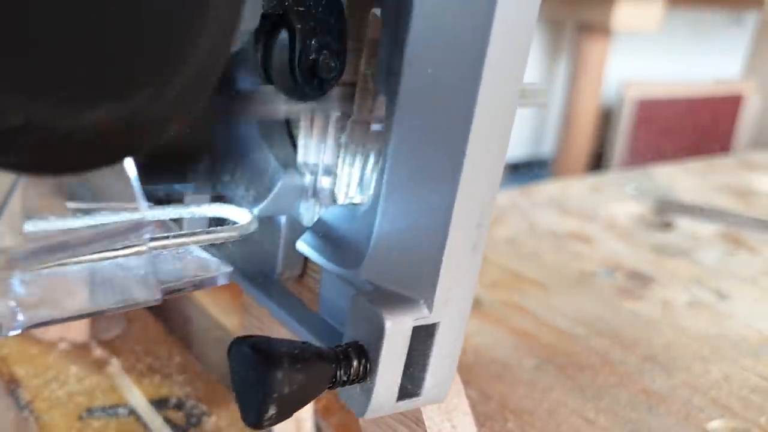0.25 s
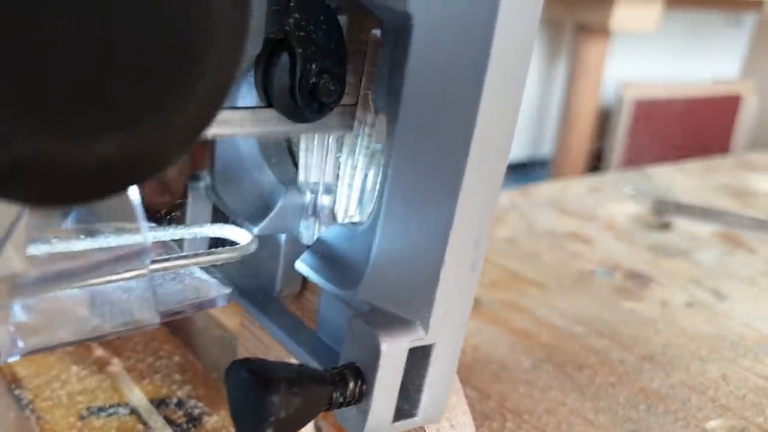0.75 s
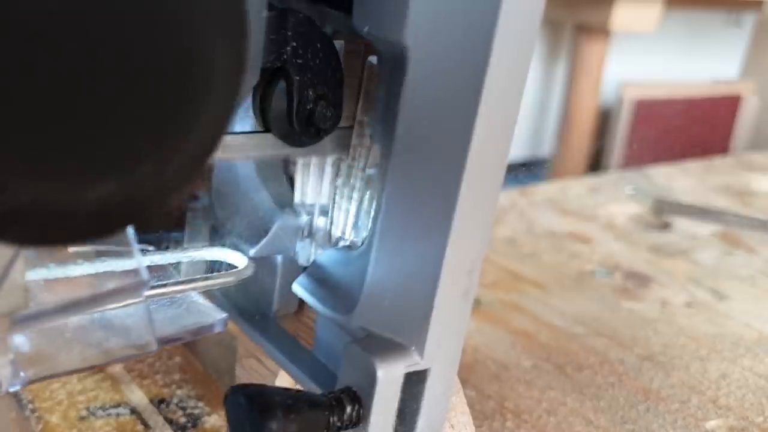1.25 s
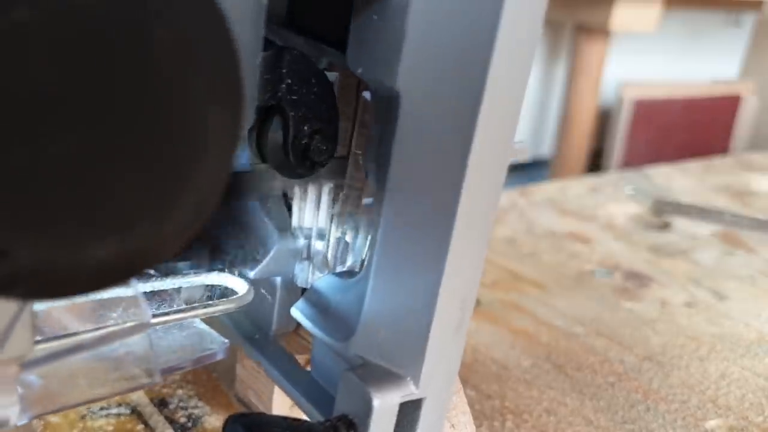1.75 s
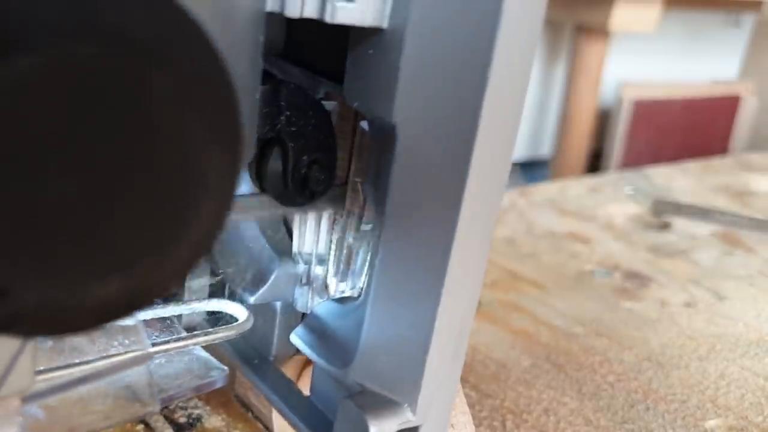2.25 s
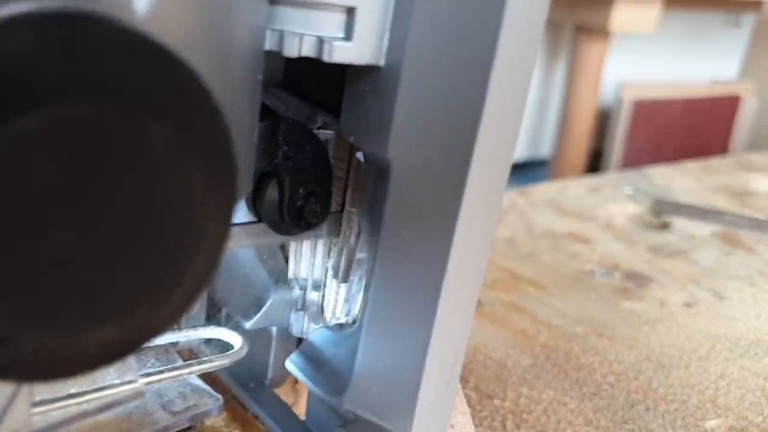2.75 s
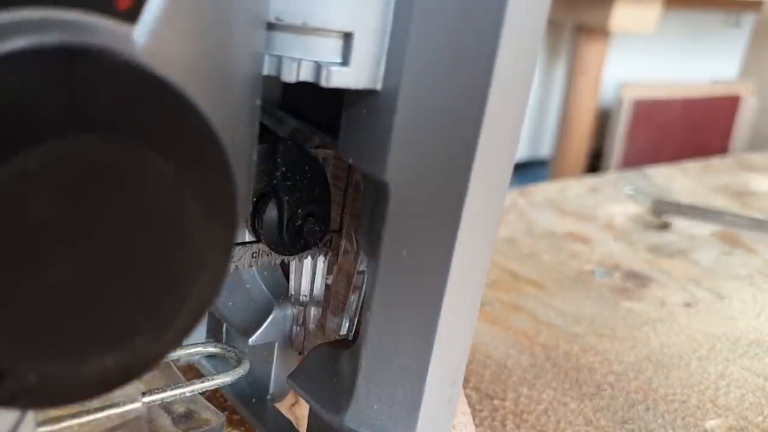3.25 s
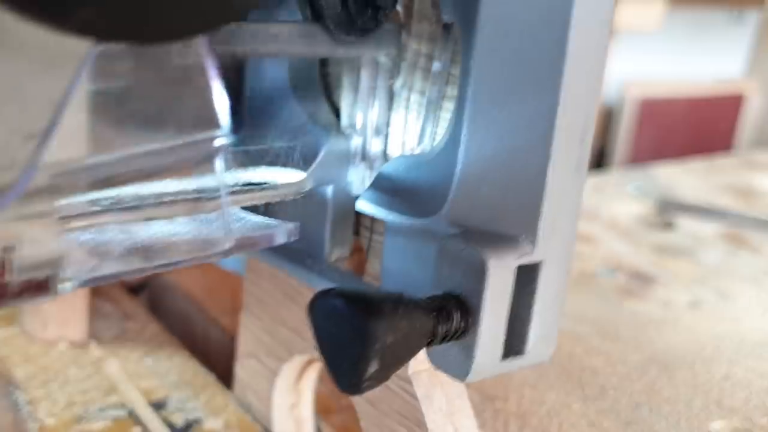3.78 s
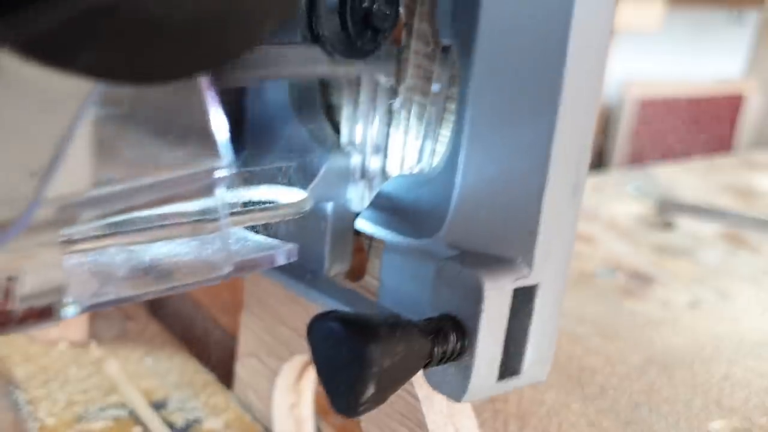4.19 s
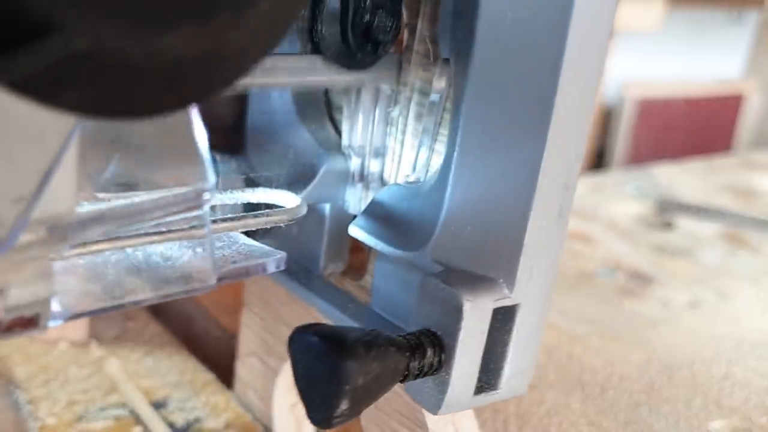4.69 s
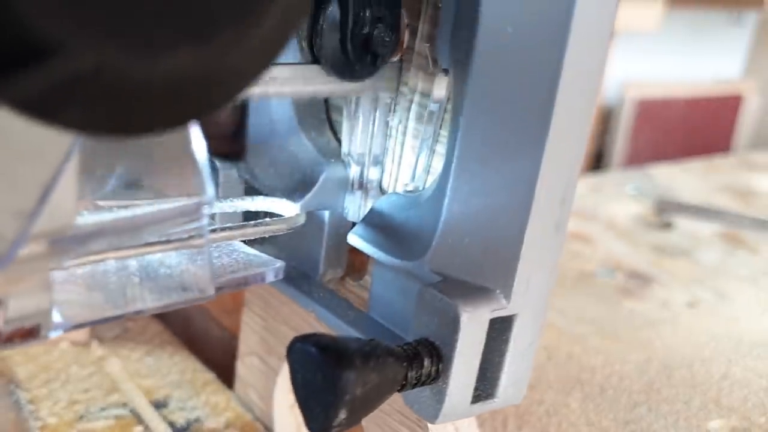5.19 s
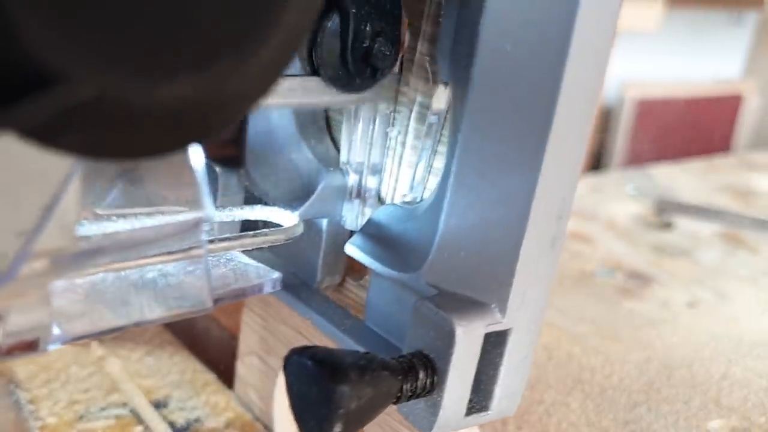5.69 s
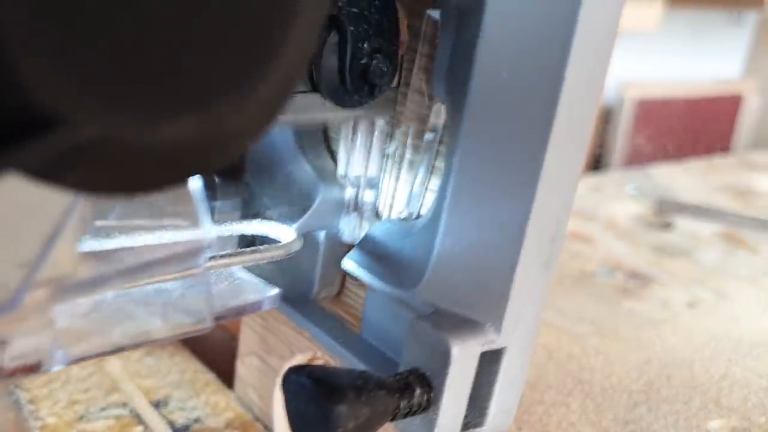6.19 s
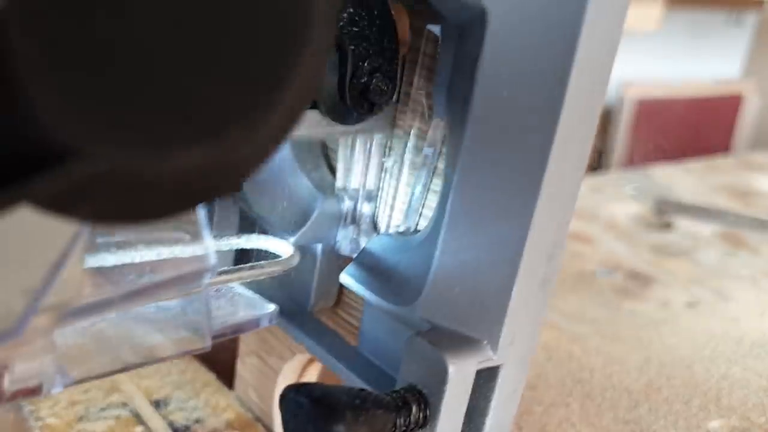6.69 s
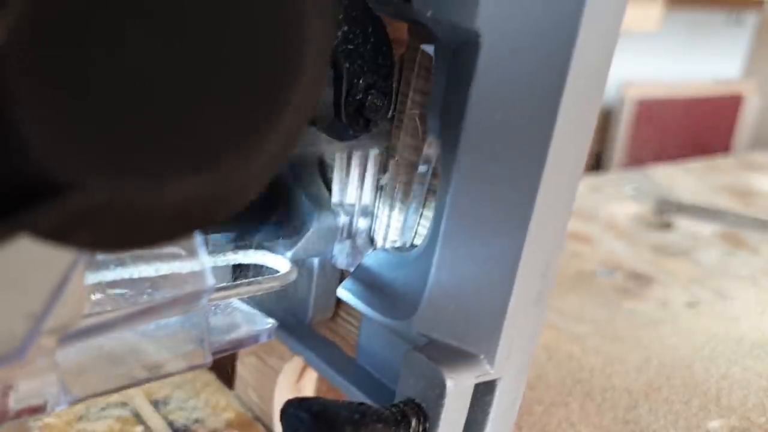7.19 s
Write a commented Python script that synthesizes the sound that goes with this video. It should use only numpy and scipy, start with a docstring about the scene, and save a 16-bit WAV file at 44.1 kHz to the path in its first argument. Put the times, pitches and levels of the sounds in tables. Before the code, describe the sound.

An electric jigsaw cuts a wooden board, close up in a quiet workshop. Its gears whine and rattle while the blade rasps, chattering and squealing as the teeth bite, and small splinters snap off. The motor stops for a moment, then starts again with a louder, throbbing rasp. It drops to a slower, lower run before climbing back to full speed.

```python
"""A jigsaw cutting a board

An electric jigsaw works through wood, close up in a quiet workshop. Its gears whine and rattle,
its body shakes and its blade rasps, chattering where the teeth bite. Splinters snap off.
It stops for a moment, with a few faint handling ticks, then runs on louder, the rasp throbbing
with each stroke. For a while it slows down, then it picks up speed again."""
import sys
import numpy as np
from scipy import signal
from scipy.fft import rfft, irfft
from scipy.io import wavfile
from scipy.ndimage import uniform_filter1d

SR = 44100
rng = np.random.default_rng(int(sys.argv[2]) if len(sys.argv) > 2 else 0)


def materialize(psi):
    """Save the field psi as 16-bit PCM at rate SR to the path in sys.argv[1].

    A 1-D psi becomes a single channel; in a 2-D psi each row is a channel.
    """
    bounded = np.clip(np.atleast_2d(psi).T, -1, 1)
    quanta = np.round(bounded * 32767).astype(np.int16)
    wavfile.write(sys.argv[1], SR, quanta)


N = 328104
T = np.arange(N) / SR
HZ = np.fft.rfftfreq(2 * N, 1 / SR)
FULL_SPEED_HZ = 1982  # gear teeth meeting each second: the "gear pitch"
BASE_TEETH, STROKE_TEETH = 57, 40  # cycles of the gear pitch per cycle of the body's slowest shaking, and per throb of the rasp

# when the motor is on (start [s], stop [s])
MOTOR_RUNS = [(-.05, 3.148), (3.778, 7.5)]
# the motor glides to a new speed, then creeps up (start [s], glide [s], gear pitch [Hz], creep [Hz/s])
SPEED_CHANGES = [(2.8, .26, 2012, 0), (3.07, .14, 1200, 0), (3.6, .1, 1987, 0), (3.84, .16, 1958, 80),
                 (4.34, .18, 1019, 0), (4.695, .08, 1388, 36), (5.85, .1, 1960, 12)]
# five stages of work: light, restart, sag, slow, full speed (start [s], slack in the gears [teeth])
STAGES = [(-1, .035), (3.5, .075), (4.46, .04), (4.74, .065), (5.885, .045)]
# each stage's mix, before speed and bite act on it
# (blade [dB], shaking [dB], whine [dB], rattle [dB], throb depth)
STAGE_MIX = [(-47.5, -68, 3, -59.5, 0.039), (-35.5, -57, 0.7, -51.5, 0.19), (-35, -58, -3, -59.5, 0.16),
             (-35.5, -50.5, 0.5, -57.5, 0.16), (-34.9, -56.5, -.5, -47.5, 0.16)]
# the teeth dig in (start [s], stop [s], time to come free [s], squeal against tearing [dB])
CUTS = [(-.08, .19, .03, -14), (1.28, 2.7, .15, -4)]
# the blade snags and swells (time [s], half length [s], boost [dB])
SNAGS = [(1.475, .05, 3.5), (2.6, 0.025, 2.5), (5.45, 0.14, 1)]
# gear tones, one list a stage (multiple of the body's slowest shaking rate, relative level [dB])
WHINE_TONES = [
    [(49, -69.5), (55, -71.5), (57, -61), (59, -65.5), (64, -81), (65, -69.5), (69, -78), (115, -70),
     (116, -73), (228, -61)],
    [(57, -50), (59, -59), (62, -69), (64, -53), (111, -69), (112, -49), (113, -61), (170, -54), (228, -53),
     (232, -69)],
    [(57, -63), (114, -55), (171, -52), (228, -55.5)],
    [(47, -78), (54, -66), (57, -56), (64, -64), (76, -70), (83, -64), (114, -71), (116, -60.5),
     (123, -62.5), (171, -59), (203, -62)],
    [(52, -59), (57, -48), (59, -54.5), (62, -57.5), (64, -59), (65, -57), (69, -56.5), (107, -56.5),
     (112, -61), (116, -56.5), (228, -47), (237, -64)],
]
# tones of the shaking body, one list a stage (multiple of its slowest shaking rate, relative level [dB])
SHAKE_TONES = [
    [(1, -7), (2, -0.5), (4, -13.5), (6, -18), (7, -9), (8, -9), (10, -14.5), (13, -13.5)],
    [(1, -0.5), (2, 3.5), (4, -20), (5, -3), (7, -3.5), (8, -9.5), (10, -11), (13, -11), (16, -10),
     (20, -9)],
    [(2, 1), (7, -17), (8, -5), (10, 0.5), (13, -1.5)],
    [(2, -1), (4, -22.5), (7, -16.5), (8, -15), (9, -18), (13, -34), (14, -23), (17, -15), (19, -24),
     (22, -16.5), (24, -20), (30, -17.5)],
    [(1, 0), (2, -2.5), (3, -15), (4, -7), (5, -12), (6, -19), (7, -8), (8, -8), (10, -11), (13, -7),
     (21, -11.5), (23, -11.5), (26, -6.5)],
]
# ringing of the gear case (pitch [Hz], width [Hz], relative level [dB])
CASE_RING = [(1687, 53, -4.5), (1830, 16, -4.5), (1876, 25, -0.5), (1993, 30, -0.5), (2180, 23, -12.5),
             (2240, 37, -3), (2418, 43, -9.5)]
# ringing of the blade, rubbing in its guide and biting (pitch [Hz], width [Hz], relative level [dB])
RUB_RING = [(7960, 55, 3.5), (8120, 95, -7), (8040, 69, -6), (8230, 45, 3.5), (7400, 120, -23.5),
            (7360, 55, -5), (3100, 66, -10.5), (4000, 150, -16.5)]
BITE_RING = [(1770, 70, 4), (4040, 200, -4), (5800, 170, -4.5), (7760, 270, -2), (10300, 210, -3)]
# tone of the blade's rasp in each kind of work (frequency [Hz], relative level [dB])
RASP_LIGHT = [(40, -33), (130, -23), (300, -23), (600, -17.5), (1050, -17), (1400, -12), (1900, -14),
              (2700, -12), (4200, -12.5), (6000, -10.5), (7200, -4), (8000, -4), (11000, -19), (14000, -27)]
RASP_BITE = [(40, -26.5), (130, -28), (300, -28.5), (600, -23.5), (1050, -22), (1400, -19), (1900, -6),
             (2700, -18.5), (4200, -12.5), (5200, -15.5), (6000, -12.5), (7200, -3), (8000, 0),
             (11000, -20.5), (14000, -24.5)]
RASP_RESTART = [(40, -19), (130, -21.5), (300, -20), (600, -18), (1050, -17), (1400, -14), (1900, -8),
                (2700, -13.5), (4200, -11.5), (6000, -10.5), (7200, -5.5), (8000, -3), (11000, -17.5),
                (14000, -25.0)]
RASP_SLOW = [(40, -21), (130, -16), (300, -15.5), (600, -15), (1050, -13), (1400, -11), (1900, -9),
             (2700, -9.5), (4200, -8), (6000, -8), (7200, -2), (8000, -1), (11000, -13.5), (14000, -23)]
RASP_HARD = [(40, -36), (130, -25), (300, -22.5), (600, -19), (1050, -18.5), (1400, -11.5), (1900, -16.5),
             (2700, -11.5), (4200, -11.5), (6000, -9.0), (7200, -5), (8000, -2), (11000, -18),
             (14000, -27.0)]
# squeal of the teeth in the cut (multiple of their passing rate, relative level [dB])
SQUEAL_TONES = [(1, -1), (2, -9), (3, -1), (4, -1), (5, -8)]
# the low hush of the room (frequency [Hz], relative level [dB])
ROOM_HUSH = [(15, -32), (25, 1.5), (54, 9), (80, -7.5), (160, -12), (271, -3), (436, -12.5), (14000, -35)]
# large splinters snapping off (time [s], relative level [dB])
SPLINTERS = [(0.016, -31), (0.0922, -27), (0.168, -26.5), (0.1885, -29), (0.3112, -33.5), (1.5745, -29),
             (1.8424, -29), (1.9195, -38), (1.9659, -28.5), (2.2815, -28), (2.3765, -28.5), (3.7907, -28),
             (3.8116, -38), (7.225, -20), (7.3816, -26)]
# ringing of the blade after a snap or tick (pitch [Hz], width [Hz], relative level [dB])
SNAP_RING = [(1920, 130, -7.5), (3920, 270, -10), (5700, 310, -10), (7770, 520, -1), (9600, 900, -16)]
# faint handling ticks in the pause (time [s], relative level [dB])
HANDLING_TICKS = [(3.4296, -91), (3.5994, -81), (3.6544, -86)]


def amp(db):
    """Turns decibels into a gain."""
    return 10 ** (np.asarray(db) / 20)


def evened(x):
    """Scales a signal to an average strength (rms) of 1."""
    return x / np.sqrt(np.mean(x ** 2) + 1e-20)


def spectrum(points):
    """Gain at every frequency, from a few (Hz, dB) points."""
    hz, db = np.transpose(points)
    return amp(np.interp(np.log(HZ + 1), np.log(hz + 1), db))


def peaks(ring):
    """Gain at every frequency of something that rings at a few pitches."""
    return np.sqrt(sum(amp(db) ** 2 / (1 + ((HZ - hz) / width) ** 2) ** 2 for hz, width, db in ring))


def colour(x, gain):
    """Filters x so that each click rings on after it; the result has strength 1."""
    cepstrum = irfft(np.log(np.maximum(gain / gain.max(), 1e-5)))
    response = np.exp(rfft(2 * cepstrum[:N], 2 * N))
    return evened(irfft(rfft(x, 2 * N) * response)[:N])


def wander(rate_hz):
    """A smooth random drift of strength 1."""
    return evened(irfft(rfft(rng.standard_normal(2 * N)) / (1 + (HZ / rate_hz) ** 4))[:N])


def grit(per_s, spread_db, share):
    """Tiny clicks of uneven size in a smooth hiss; share is their part of the power."""
    sizes = amp(spread_db * np.minimum(rng.exponential(1, N), 4)) * rng.choice([-1, 1], N)
    clicks = evened(sizes * (rng.random(N) < per_s / SR))
    return np.sqrt(share) * clicks + np.sqrt(1 - share) * rng.standard_normal(N)


def held(rows):
    """A setting that holds from each (time, value) until the next."""
    starts, values = np.transpose(rows)
    return values[np.searchsorted(starts, T) - 1]


def stage_shares(blend_s=0.049):
    """How much of each stage is heard at every moment; the squares add up to 1."""
    begun = [np.clip((T - start) / blend_s + .5, 0, 1) for start, _ in STAGES] + [np.zeros(N)]
    return np.sqrt(np.maximum(-np.diff(begun, axis=0), 0))


def bite_depth(first=.94, settled=.5, grazing=.0999, entry_s=.1, settle_s=.45):
    """How hard the teeth bite, 0-1: each cut digs in, settles and comes free."""
    bite = grazing * (T < CUTS[-1][1])
    for start, stop, free_s, _ in CUTS:
        depth = settled + (first - settled) * np.exp(-((T - start) / settle_s) ** 2)
        entering = np.clip((T - start) / entry_s, 0, 1)
        leaving = np.clip(1 - (T - stop) / free_s, 0, 1)
        bite = np.maximum(bite, depth * entering * leaving)
    return bite


def motor_on(start, stop, rise_s=0.0073, brake_s=0.01):
    """The motor comes on at once and dies away under its brake."""
    return np.clip((T - start) / rise_s, 0, 1) * np.exp(-np.maximum(T - stop, 0) / brake_s)


def motor_speed(bite, sag_hz=16):
    """The gear pitch glides from speed to speed, sags under load and is never quite steady."""
    hz = np.full(N, float(FULL_SPEED_HZ))
    for start, glide_s, to_hz, creep in SPEED_CHANGES:
        progress = np.clip((T - start) / glide_s, 0, 1)
        target_hz = to_hz + creep * (T - start - glide_s)
        hz += (target_hz - hz) * np.sin(np.pi / 2 * progress) ** 2
    return hz - sag_hz * bite + 3 * wander(2)


def base_tones(teeth, tones, fade_db=0):
    """Tones at multiples of the slowest shaking rate; they drift, as every cycle lands a little differently."""
    turns = np.arange(teeth[0], teeth[-1] + BASE_TEETH, BASE_TEETH)
    sound = 0
    for multiple, db in tones:
        landing, fading = rng.standard_normal((2, len(turns)))
        slip = 0.013 * np.sqrt(multiple) * np.interp(teeth, turns, landing)
        drift_db = fade_db * np.sqrt(multiple / BASE_TEETH) * evened(uniform_filter1d(fading, size=4))
        level = np.interp(teeth, turns, amp(db + drift_db))
        cycles = multiple * teeth / BASE_TEETH + slip + rng.random()
        sound += level * np.cos(2 * np.pi * cycles)
    return np.sqrt(2) * sound


def gear_whine(teeth, gear_hz, bite):
    """Slack makes the gear tones waver and fade, more so while the blade bites or the speed changes."""
    changing = uniform_filter1d(np.clip(abs(np.gradient(gear_hz)) * SR / 5000, 0, 1), size=1500)
    slack = held(STAGES) + .07 * bite + .05 * changing
    loose_teeth = teeth + slack * wander(100)
    level = amp(-2.5 * bite - 6 * changing + 1.6 * wander(90))
    whine = np.zeros(N)
    for share, (_, _, db, _, _), tones in zip(stage_shares(), STAGE_MIX, WHINE_TONES):
        on = share > 0
        whine[on] += amp(db) * (share * level)[on] * base_tones(loose_teeth[on], tones, fade_db=1.8)
    return whine


def gear_rattle(stroke):
    """Loose gear teeth knock the case into ringing, pulsing a little with each stroke."""
    knocks = colour(grit(per_s=640, spread_db=-1, share=0.84), peaks(CASE_RING))
    return knocks * sum(share * amp(db) * np.exp(0.31 * depth * stroke)
                        for share, (_, _, _, db, depth) in zip(stage_shares(), STAGE_MIX))


def body_shake(teeth):
    """The saw's body shakes at multiples of a slow base rate."""
    shake = np.zeros(N)
    for share, (_, db, _, _, _), tones in zip(stage_shares(), STAGE_MIX, SHAKE_TONES):
        on = share > 0
        shake[on] += amp(db) * share[on] * evened(base_tones(teeth[on], tones))
    return shake


def blade_rasp(stroke):
    """The blade rubs through its guide and the cut, throbbing with each stroke and ringing near 8 kHz."""
    friction = grit(per_s=3500, spread_db=1.5, share=0.37) * amp(.5 * wander(240))
    shapes = RASP_LIGHT, RASP_RESTART, RASP_SLOW, RASP_SLOW, RASP_HARD
    rasp = np.zeros(N)
    for share, (*_, depth), shape in zip(stage_shares(), STAGE_MIX, shapes):
        throb = np.exp(depth * stroke)
        rasp += share * colour(friction * throb, spectrum(shape) * (1 + peaks(RUB_RING)))
    return rasp


def tooth_squeal(start_hz=1930, sink_hz_per_s=50):
    """The teeth squeal at their uneven passing rate, which sinks as the long cut deepens."""
    passing_hz = start_hz - sink_hz_per_s * np.maximum(T - CUTS[-1][0], 0)
    passes = np.cumsum(passing_hz + 35 * wander(25) + 65 * wander(300)) / SR
    return sum(amp(db + 3 * wander(200)) * np.cos(2 * np.pi * k * passes) for k, db in SQUEAL_TONES)


def blade_chatter(judder_hz=20.9):
    """Biting teeth tear fibres and squeal in bursts as the blade judders."""
    judder = 2 * np.pi * np.cumsum(judder_hz + .2 * wander(3)) / SR
    bursts_db = 1.3 * np.cos(2 * judder) + 2.1 * np.cos(3 * judder) + 1.9 * np.cos(5 * judder)
    bursts = evened(amp(bursts_db + 1.3 * wander(35)))
    fibres = grit(per_s=2400, spread_db=5, share=0.61) * bursts
    tearing = colour(fibres, spectrum(RASP_BITE) * (1 + peaks(BITE_RING)))
    squeal = evened(tooth_squeal() * bursts ** 1.1)
    squeal_db = held([(start, db) for start, _, _, db in CUTS])
    return evened(tearing + amp(squeal_db) * squeal)


def blade(stroke, bite, bite_boost_db=6):
    """The harder the blade bites, the louder it gets and the more its rasp turns to chatter."""
    stage_db = sum(share ** 2 * db for share, (db, *_) in zip(stage_shares(), STAGE_MIX))
    snag_db = sum(db * np.exp(-((T - time) / half_s) ** 2) for time, half_s, db in SNAGS)
    cutting = np.sqrt(1 - bite) * blade_rasp(stroke) + np.sqrt(bite) * blade_chatter()
    return amp(stage_db + bite_boost_db * bite + snag_db) * cutting


def jigsaw(bite, db_per_tenfold_speed=33):
    """The motor's speed sets the gear pitch, the pace of the strokes and how loud blade and body are."""
    gear_hz = motor_speed(bite)
    teeth = np.cumsum(gear_hz) / SR  # gear teeth passed so far
    speed_gain = amp(db_per_tenfold_speed * np.log10(gear_hz / FULL_SPEED_HZ))
    # slow strokes stand further apart, so they throb more deeply
    stroke = np.cos(2 * np.pi * teeth / STROKE_TEETH) * FULL_SPEED_HZ / gear_hz
    gears = gear_whine(teeth, gear_hz, bite) + gear_rattle(stroke)
    running = sum(motor_on(*run) for run in MOTOR_RUNS)
    return running * (gears + speed_gain * (body_shake(teeth) + blade(stroke, bite)))


def board_bumps(bite):
    """The board bumps softly on the bench while the teeth bite."""
    bumps = colour(grit(per_s=25, spread_db=2, share=.8), peaks([(28, 30, 0)]))
    return amp(-73) * bite * bumps


def room_hush():
    """The quiet workshop: a very faint, low noise."""
    return amp(-96.5) * colour(rng.standard_normal(N), spectrum(ROOM_HUSH))


def snaps(rows, decay_s, gain_db):
    """Short sprays of cracks that ring the blade."""
    envelope = sum(amp(db) * (T > time) * np.exp(-abs(T - time) / decay_s) for time, db in rows)
    return amp(gain_db) * envelope * colour(rng.standard_normal(N), peaks(SNAP_RING))


def scene():
    """The saw, the board and the splinters over the hush of the room."""
    bite = bite_depth()
    room = room_hush()
    splinters = snaps(SPLINTERS, decay_s=.0055, gain_db=-6)
    handling = snaps(HANDLING_TICKS, decay_s=0.00976, gain_db=-11)
    return (jigsaw(bite) + board_bumps(bite) + room + splinters + handling)[None]


def record(dry):
    """Cuts off the highest treble, above 14.2 kHz."""
    low_pass = signal.firwin(511, 14200, window=("kaiser", 9), fs=SR)
    return signal.oaconvolve(dry, low_pass[None], "same")


dry = scene()
out = record(dry)
materialize(out)
```